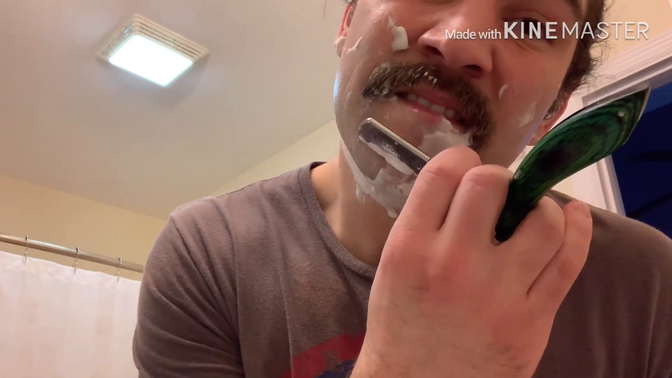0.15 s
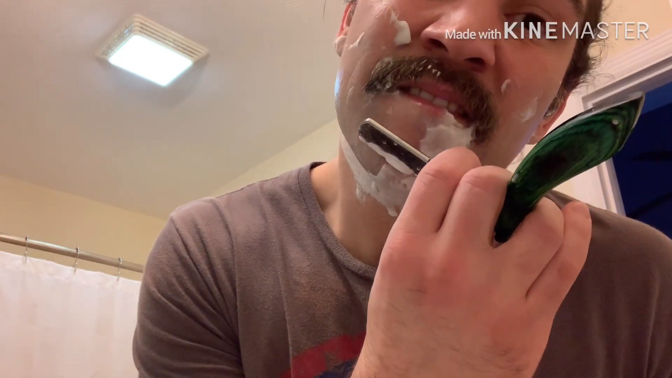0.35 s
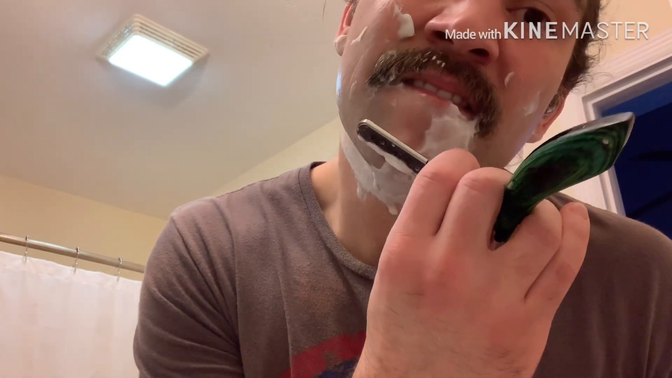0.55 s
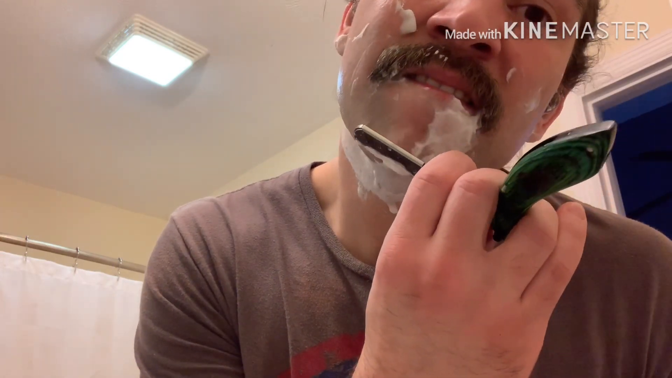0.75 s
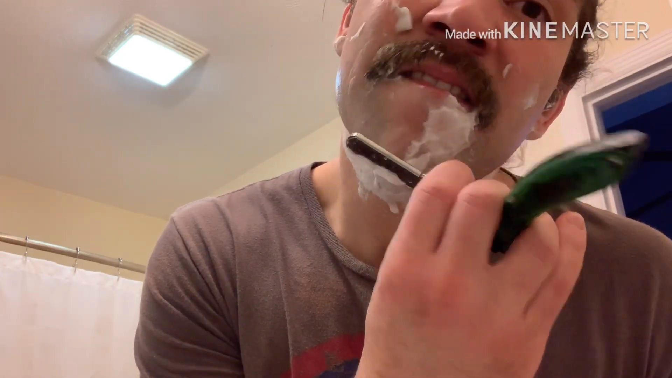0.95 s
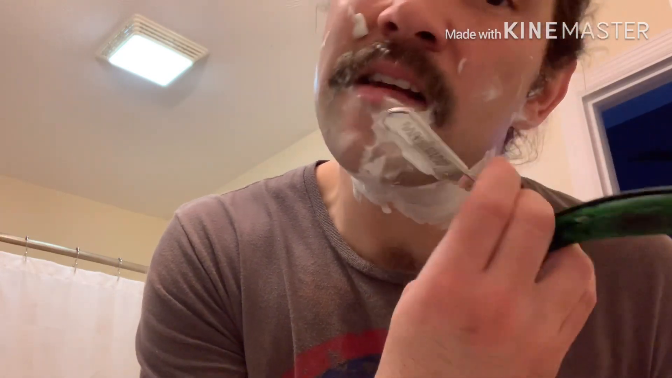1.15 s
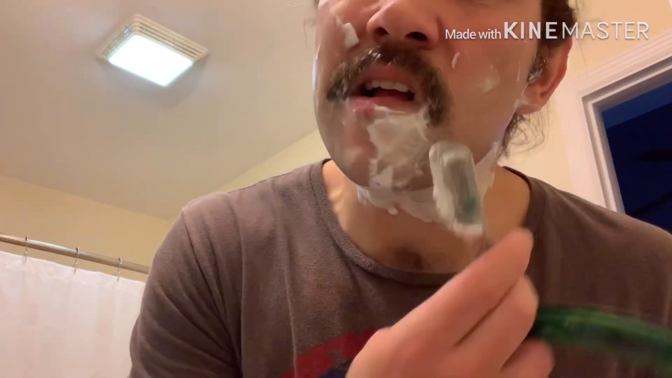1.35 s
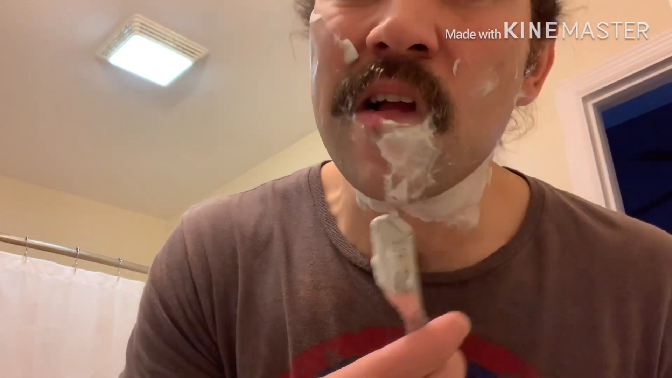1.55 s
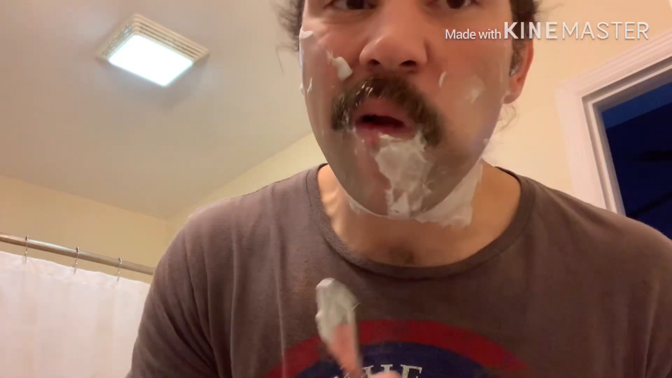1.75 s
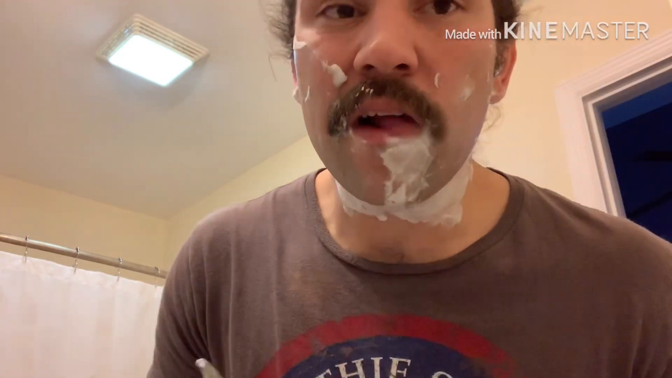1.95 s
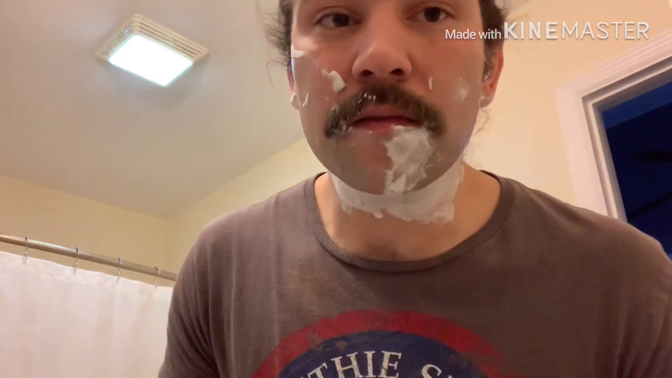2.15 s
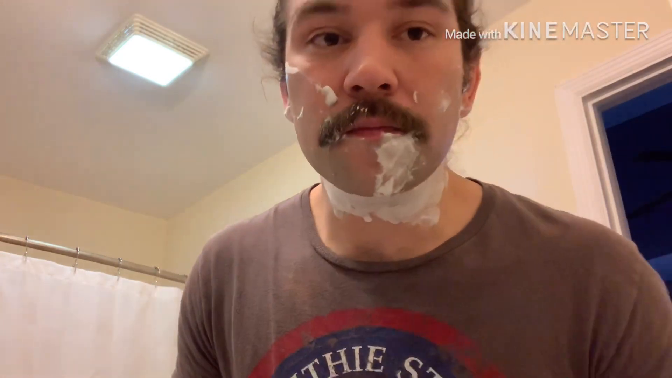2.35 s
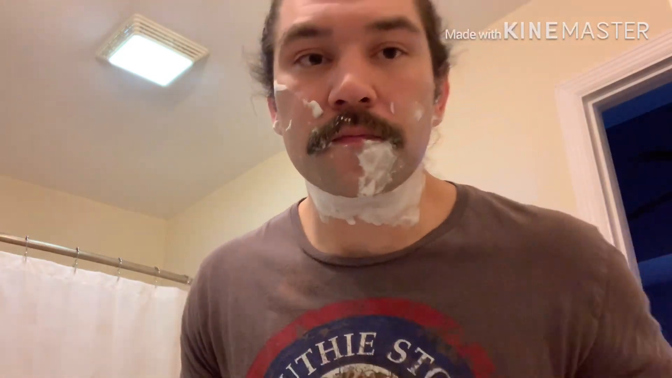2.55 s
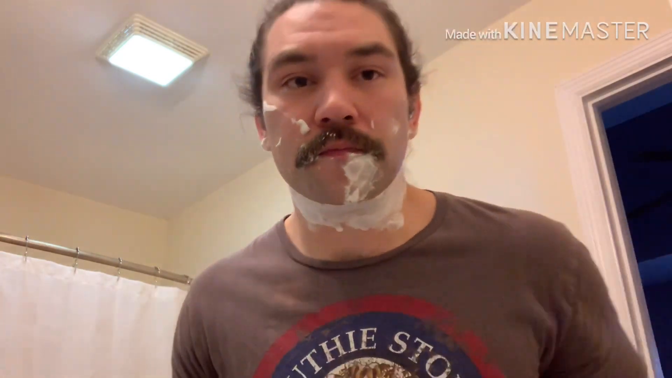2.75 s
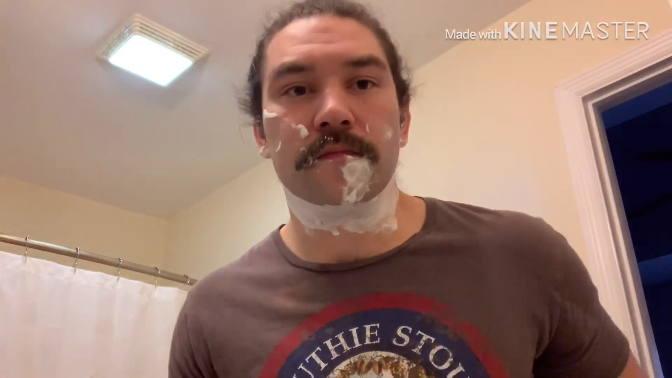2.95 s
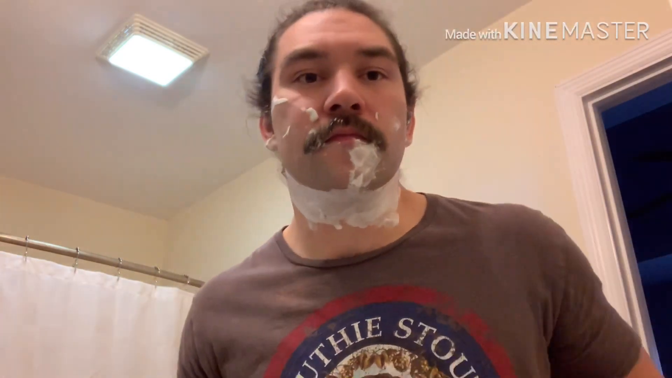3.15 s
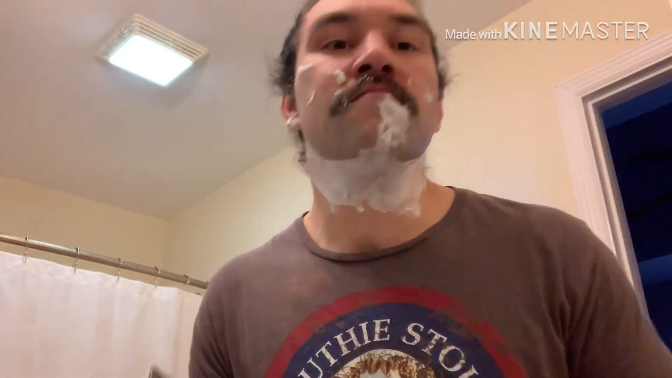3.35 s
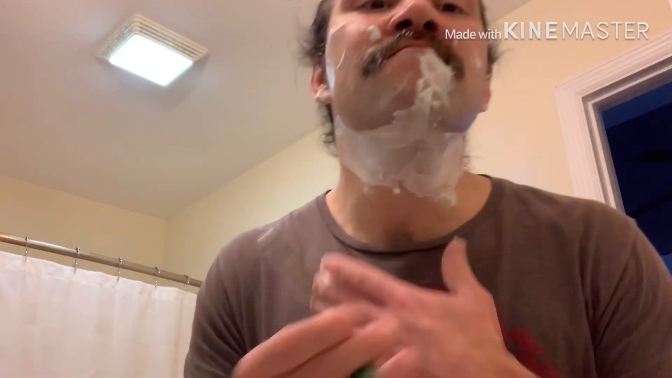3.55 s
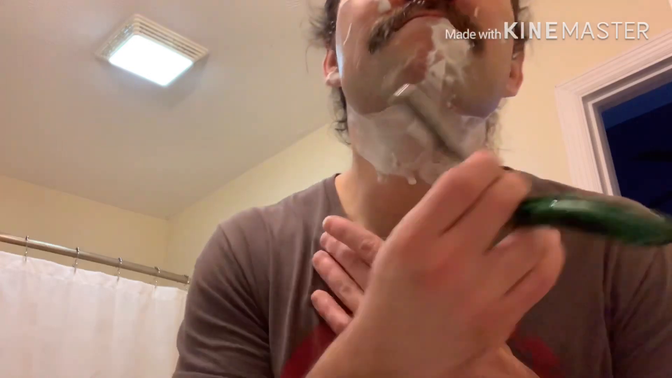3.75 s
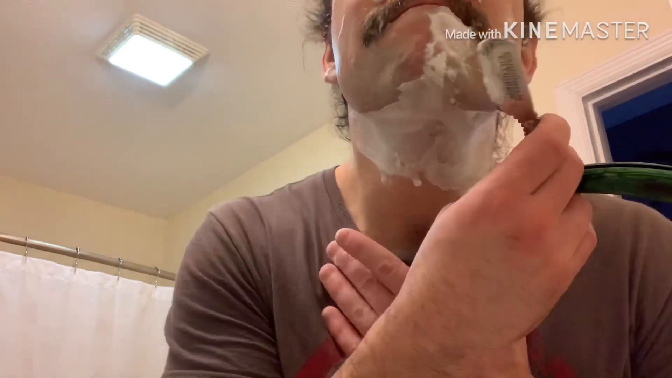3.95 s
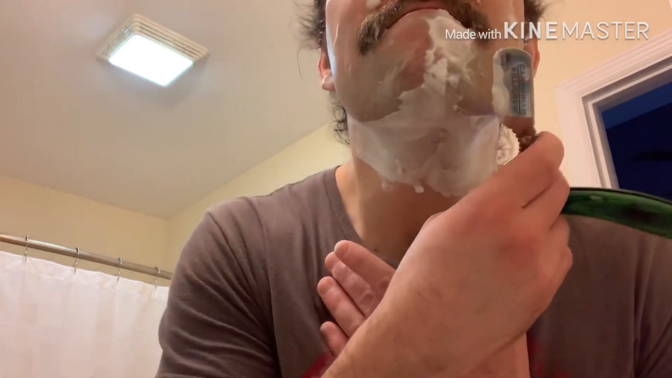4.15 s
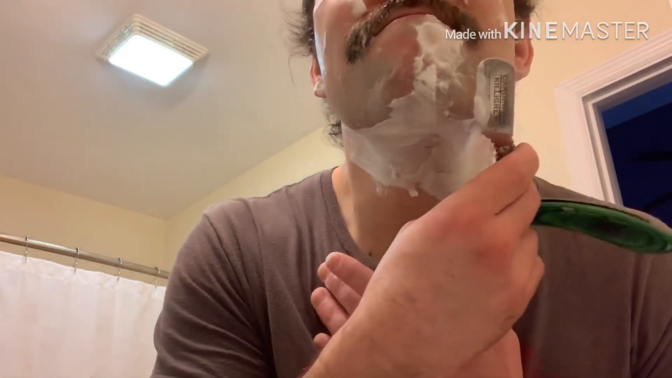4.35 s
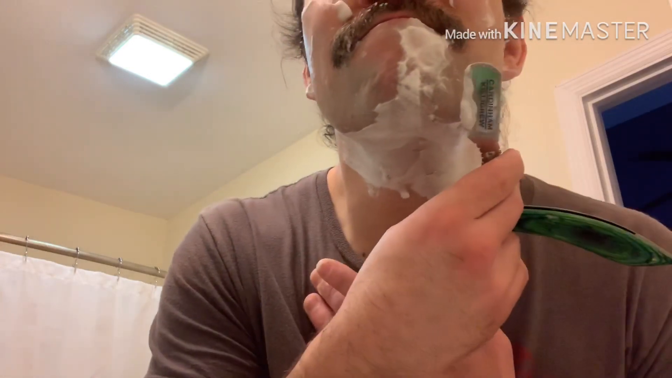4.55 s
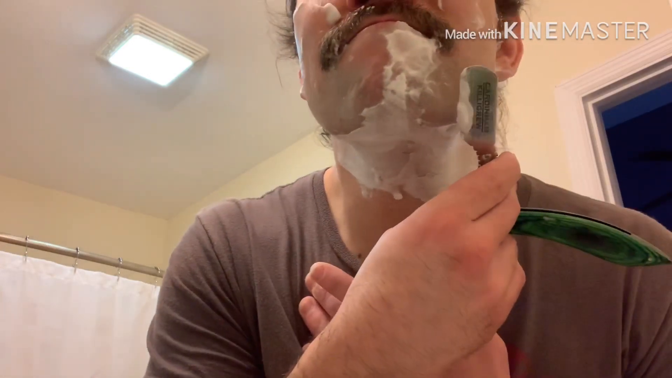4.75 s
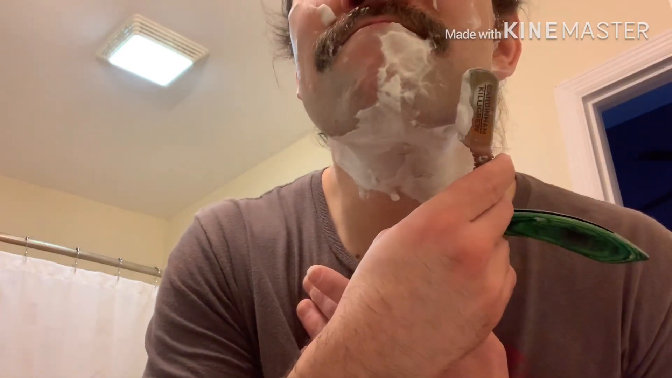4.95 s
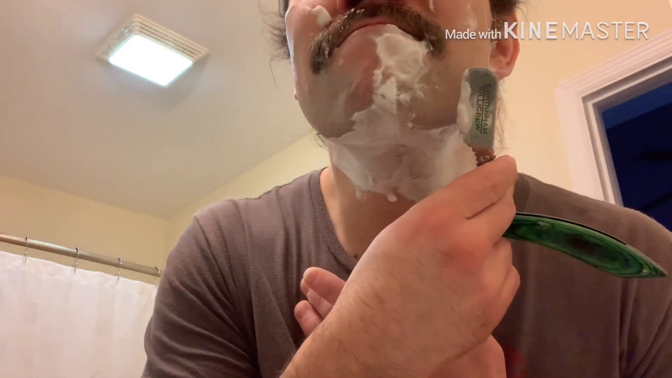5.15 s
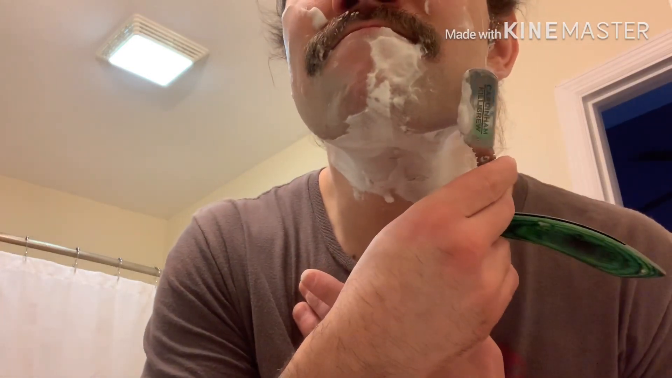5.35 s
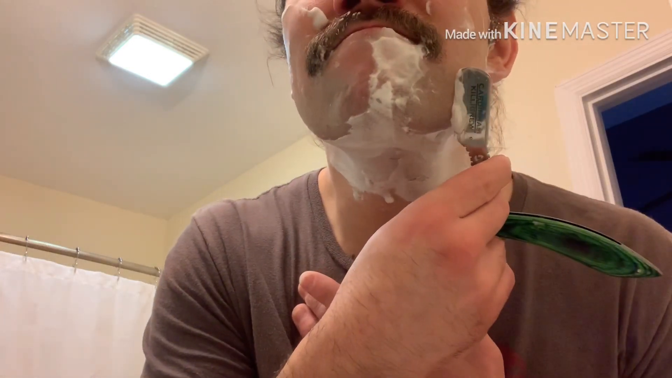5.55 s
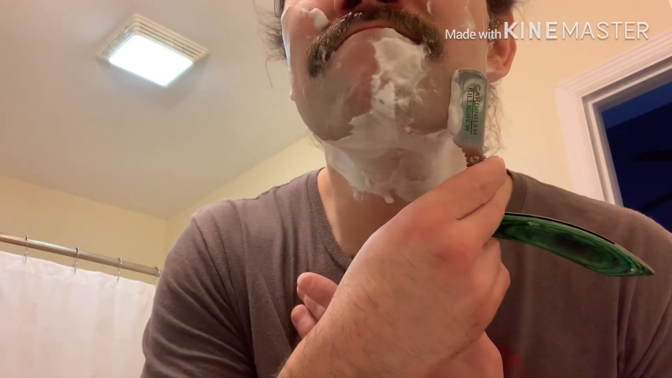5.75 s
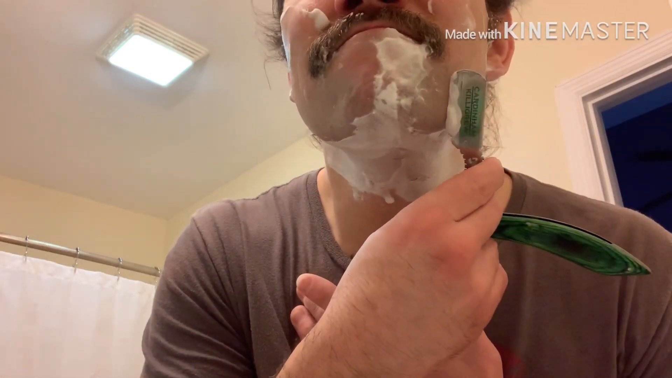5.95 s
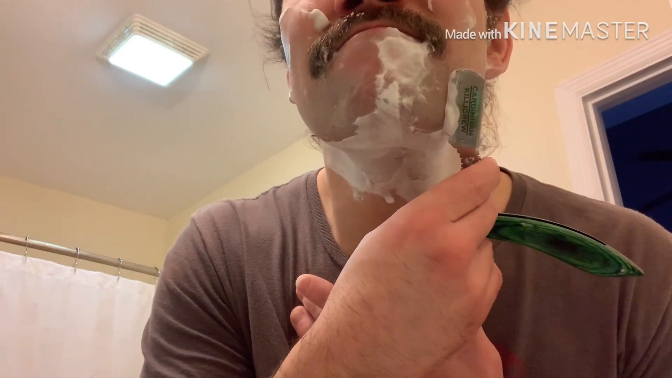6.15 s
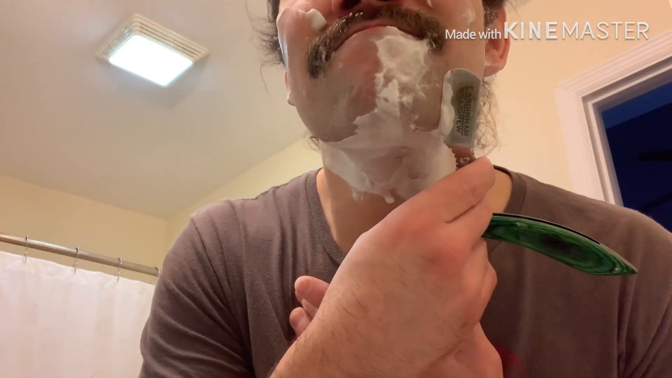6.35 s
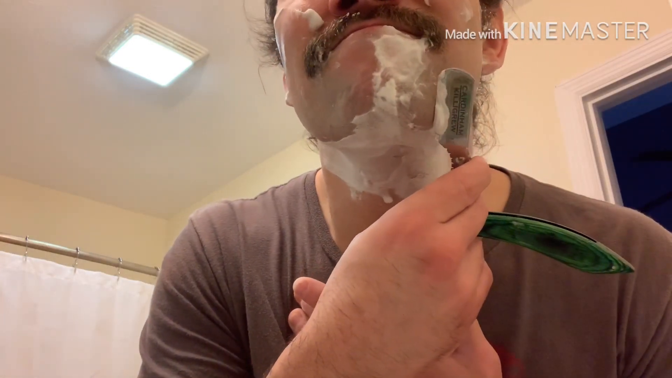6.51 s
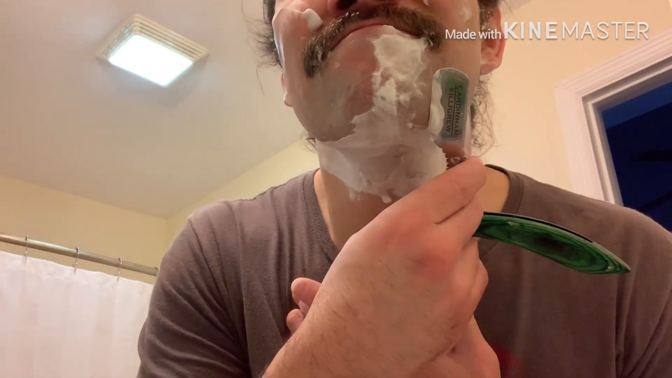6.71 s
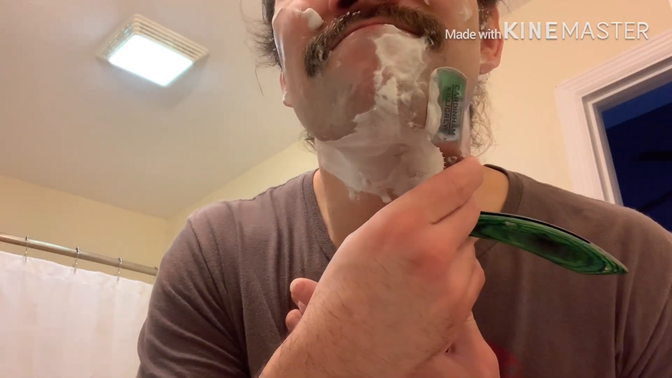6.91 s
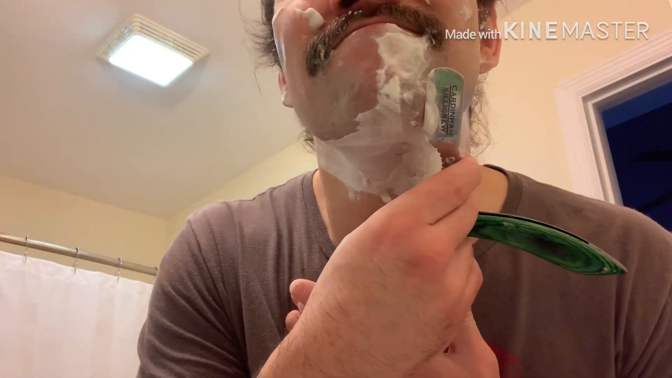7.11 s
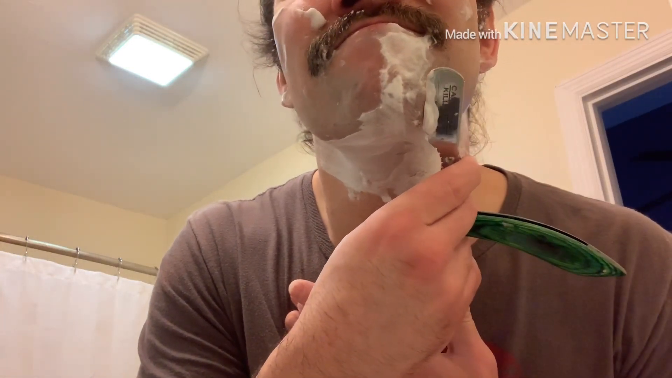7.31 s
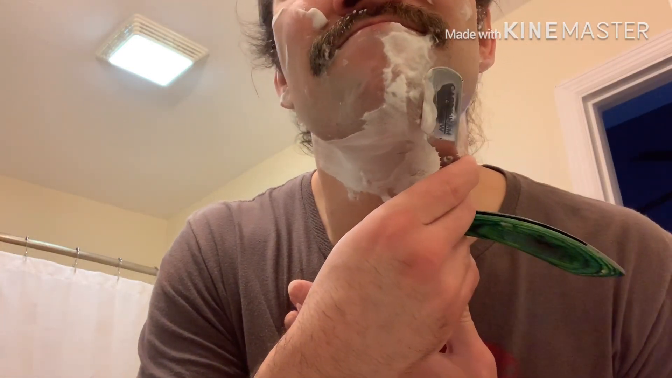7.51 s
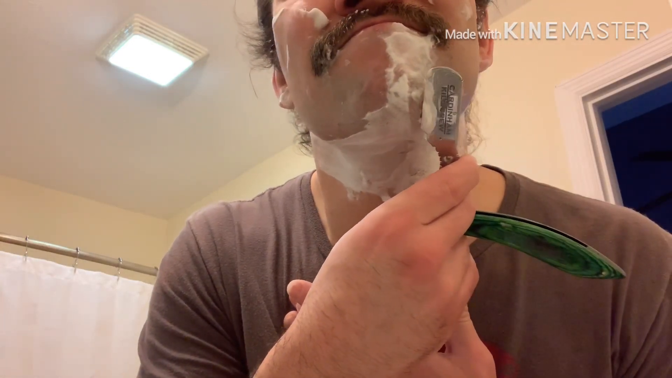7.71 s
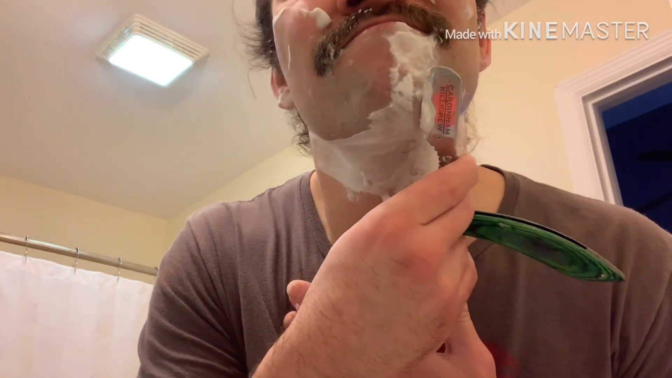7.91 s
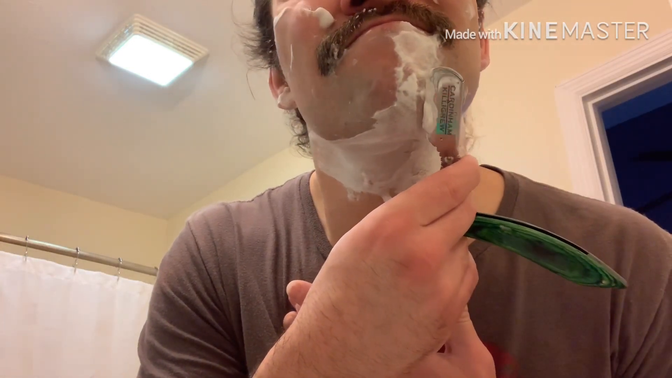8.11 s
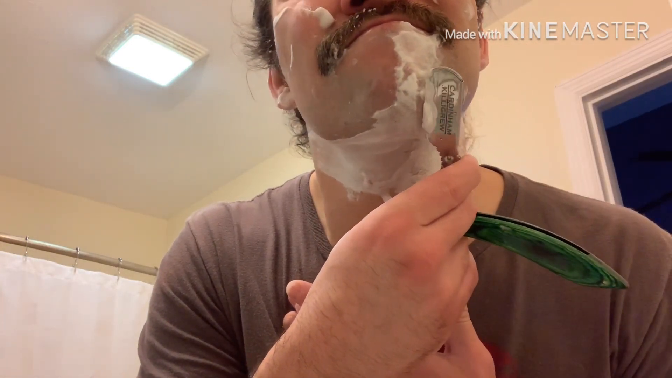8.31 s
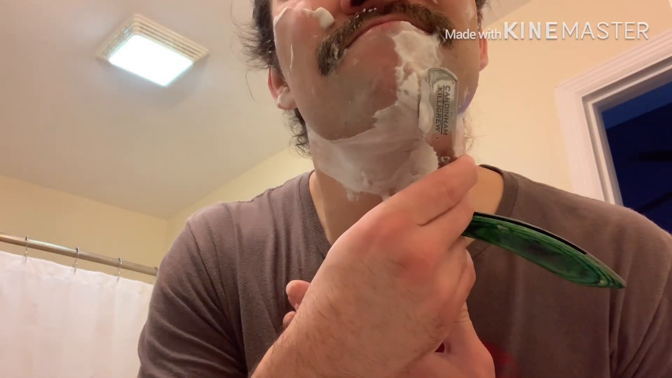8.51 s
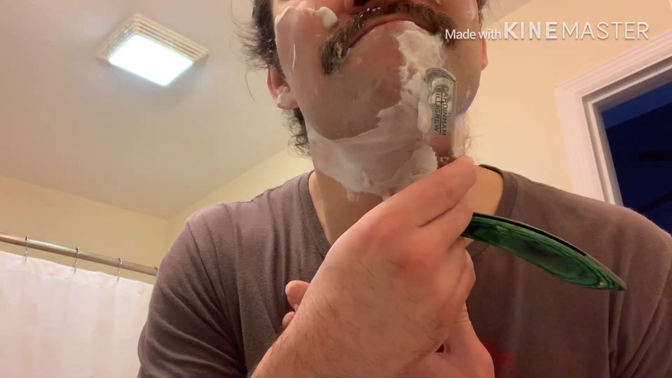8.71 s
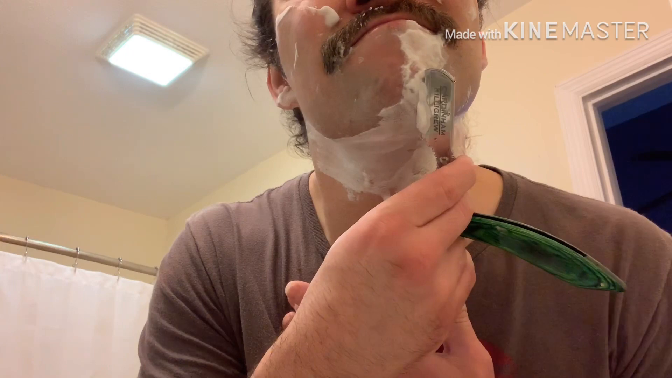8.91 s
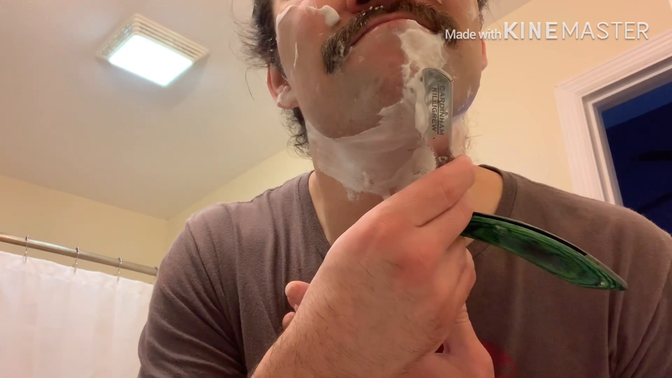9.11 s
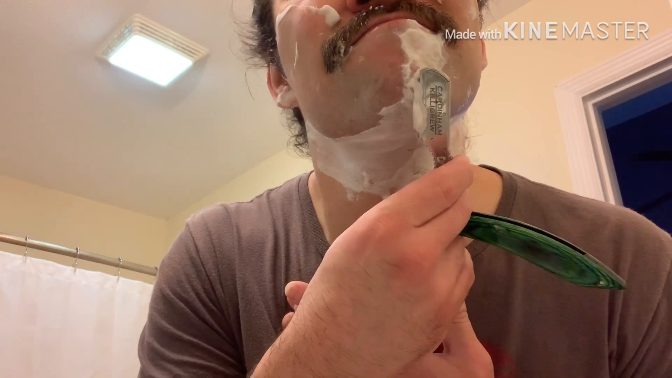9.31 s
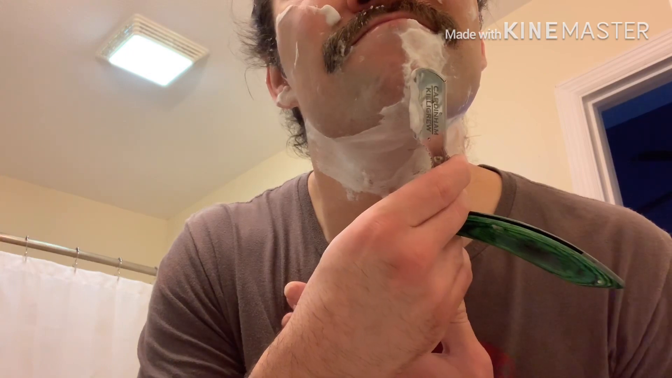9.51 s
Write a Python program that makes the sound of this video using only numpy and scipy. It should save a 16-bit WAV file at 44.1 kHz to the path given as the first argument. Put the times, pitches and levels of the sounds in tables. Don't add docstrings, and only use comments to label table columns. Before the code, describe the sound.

A razor crackles through lathered stubble in a small fan-hummed bathroom, pauses for a rubbing, spraying, knocking rinse, then resumes with brighter snaps.

```python
import sys
import numpy as np
from scipy import signal
from scipy.fft import rfft, irfft, next_fast_len
from scipy.io import wavfile
from scipy.ndimage import uniform_filter1d

SR = 44100
rng = np.random.default_rng(int(sys.argv[2]) if len(sys.argv) > 2 else 0)


def inscribe(sig):
    pcm = np.round(np.clip(np.atleast_2d(sig).T, -1, 1) * 32767)
    wavfile.write(sys.argv[1], SR, pcm.astype(np.int16))


def boost_factor(decibels):
    exponent = np.asarray(decibels, float) / 20
    return 10 ** exponent


N = 426447
SIZE = next_fast_len(N + SR)
HZ = np.arange(SIZE // 2 + 1) * SR / SIZE + 1e-3
TIME = np.arange(N) / SR


def on_log(table, hz=HZ):
    f, value = np.transpose(table)
    return np.interp(np.log(hz), np.log(f), value)


def colour(table):
    low_hz, low_db = table[0]
    return boost_factor(on_log([(low_hz / 2, low_db - 30), *table, (table[-1][0] * 1.05, -90)]))


def resonance(hz, width):
    return 1 / (1 + 1j * (HZ - hz ** 2 / HZ) / width)


def shape(x, gain):
    return irfft(rfft(x, SIZE) * gain, SIZE)[..., :N]


def level(x, db):
    return x * boost_factor(db) / np.sqrt(np.mean(x ** 2))


def walk(rate):
    hold = int(SR / rate)
    steps = np.repeat(rng.standard_normal(N // hold + 1), hold)
    slewed = uniform_filter1d(uniform_filter1d(steps, hold), hold)
    return level(slewed[:N], 0)


def swells(table, tilt_db=0):
    peak_s, rise, fall, db = np.transpose(table)[:4, :, None]
    t = TIME[::32]
    before = (peak_s - t) / np.maximum(rise, .005)
    after = (t - peak_s) / np.maximum(fall, .005)
    ramp = np.where(t < peak_s, before, after)
    power = np.sum(boost_factor(db + tilt_db - 20 * ramp) ** 2, axis=0)
    return np.interp(TIME, t, np.sqrt(power))


def grit(spread_db, rate):
    sizes = boost_factor(spread_db * np.minimum(rng.exponential(size=N), 2))
    slips = uniform_filter1d(sizes * (rng.random(N) < rate / SR), size=40)
    return rng.standard_normal((2, N)) * (4 + level(slips, 0))


def patchy(x, gain, patchy_db, rate):
    spectrum, out = rfft(x, SIZE) * gain, 0
    for hz in 300 * 2 ** np.arange(0, 4.8, .4):
        weight = np.clip(1 - abs(np.log2(HZ / hz)) / .4, 0, 1)
        band = irfft(spectrum * weight, SIZE)[:, :N]
        out = out + band * boost_factor(patchy_db * walk(rate))
    return out


def burst(t60, rise=0.00017):
    t = np.arange(int(t60 * SR)) / SR
    return rng.standard_normal(len(t)) * boost_factor(-60 * t / t60) * np.clip(t / rise, 0, 1)


# (frequency [Hz], time [s])
ROOM_T60 = [(500, 0.95), (2000, 0.29), (6000, 0.21), (12000, 0.058)]


def room():
    t, tail = np.arange(SR) / SR, 0
    for hz in 250 * 2. ** np.arange(7):
        edges = [hz / 2 ** .5, min(hz * 2 ** .5, .45 * SR)]
        octave = signal.butter(2, edges, "band", fs=SR, output="sos")
        noise = signal.sosfilt(octave, rng.standard_normal((2, SR)))
        tail = tail + noise * boost_factor(-60 * t / on_log(ROOM_T60, hz)) * np.clip(t / 0.001 - .4, 0, 1)
    return rfft(tail / np.sqrt(np.sum(tail ** 2) / 2), SIZE)


# (frequency [Hz], level per Hz [dB])
HISS = [(1500, -5.5), (3000, -3), (6000, -7.5), (10000, -4.5), (14200, -6), (14900, -10.5), (15500, -32)]


def microphone_hiss():
    return level(shape(rng.standard_normal((2, N)), colour(HISS)), -82.5)


# (frequency [Hz], level per Hz [dB])
FAN_AIR = [(12, -44), (20, -6), (54, 0.5), (81, -6), (107, -2), (208, -3.5), (294, -9), (338, -16),
           (431, -9.5), (487, -18), (584, -13), (659, -30.5), (892, -32), (1140, -38.5), (2500, -48.5),
           (3250, -97), (5500, -120)]
# (frequency [Hz], width [Hz], level [dB])
DUCT_MODES = [(53, 17, 4), (110, 7.6, 6.5), (165, 4.8, 2), (207.8, 14, 7), (294.8, 13, 7), (365.5, 16, 3),
              (577, 25, -2), (816, 77, 9.5)]


def fan():
    duct = 1 + sum((boost_factor(db) - 1) * abs(resonance(hz, width)) for hz, width, db in DUCT_MODES)
    turbulence = rng.standard_normal((2, SIZE))
    air = shape(turbulence, colour(FAN_AIR) * duct) * boost_factor(.6 * walk(2))
    return level(air, -51)


# (peak time [s], rise [s], fall [s], peak level [dB])
LEAN = [(1.74, 0.17, .15, -53), (1.93, 0.15, 0.084, -49.5), (2.19, 0.21, 0.48, -38),
        (2.43, 0.37, 0.21, -36), (2.82, .3, 0.74, -44.5), (3.62, 0.054, 0.13, -59),
        (3.92, 0.23, 0.26, -50.5), (4.08, 0.075, 0.22, -51), (4.43, 0.075, 0.18, -49.5),
        (4.66, 0.23, 0.13, -53), (4.85, .2, 0.15, -51)]
# (frequency [Hz], width [Hz], level [dB])
COUNTER_MODES = [(53.8, 17.3, 1.5), (132.5, 40.6, -0.5), (351.3, 14.6, -3.5), (600, 190, -36)]


def counter():
    modes = sum(boost_factor(db) * abs(resonance(hz, 1.56 * width)) ** 2 for hz, width, db in COUNTER_MODES)
    return swells(LEAN) * level(shape(rng.standard_normal((2, N)), modes), 0.2)


# (peak time [s], rise [s], fall [s], peak level [dB])
RINSE = [(2.21, 0.22, 0.25, -69.5), (2.44, 0.47, 0.24, -70.5), (2.57, 0.23, .5, -71.5),
         (2.8, 0.0044, 0.11, -53), (3.0, 0.1, 0.18, -57.5), (3.1, 0.22, 0.13, -56.5),
         (3.19, 0.27, 0.069, -58), (3.74, 0.62, 0.14, -74), (3.92, 0.24, 1, -78), (4.42, .1, 0.11, -74.5),
         (4.53, 0.017, .02, -72)]
# (frequency [Hz], level per Hz [dB])
SPRAY = [(2500, -5), (4000, 0), (6000, 4), (8500, 6), (11500, 1), (13500, -3), (15500, -1), (15900, -23)]


def rinse():
    spray = level(shape(grit(1.2, rate=2400), colour(SPRAY)), 2.5)
    return spray * swells(RINSE) * boost_factor(walk(30.47))


# (peak time [s], rise [s], fall [s], peak level [dB], bright fibres [dB])
RUB = [(1.72, .04, 0.2, -64, -16), (1.86, 0.17, 0.23, -68.5, -20), (2.19, 0.16, 0.27, -45.5, -10.5),
       (2.43, 0.19, 0.1, -49, -11.5), (2.58, 0.17, 0.08, -54.5, -14), (2.79, 0.21, 0.18, -51.5, -14),
       (2.94, 0.046, 0.27, -52.5, -5), (3.08, 0.23, 0.18, -59.5, 7.5), (3.18, .2, 0.13, -59, -6),
       (3.53, 0.15, 0.35, -69.5, -10), (3.72, 0.57, 0.23, -71.5, -1.5), (3.92, 0.22, 0.17, -55, -14),
       (4.06, 0.084, 0.13, -57, -18), (4.25, 0.094, 0.11, -66.5, -25), (4.4, 0.13, 0.23, -56.5, -4.5),
       (4.6, 0.28, 0.45, -64, -7), (4.85, 0.51, 0.052, -71, -13), (5.38, 0.019, 0.085, -68, -10),
       (7.64, .04, .15, -80, -6)]
# (frequency [Hz], level per Hz [dB])
CLOTH_BODY = [(300, 7.5), (590, 9), (670, -1.5), (860, 3), (1100, -2), (1400, 1), (1900, -3.5),
              (2500, -12.5), (3500, -17), (5000, -77)]
# (frequency [Hz], level per Hz [dB])
FIBRES = [(2000, 15), (3000, 10.5), (4500, 6), (6500, -9), (8000, -6)]


def cloth():
    folds = level(patchy(grit(4.0, rate=580), colour(CLOTH_BODY), patchy_db=2.5, rate=40), 5.35)
    fibres = level(shape(grit(1.7, rate=94), colour(FIBRES)), 0.52)
    fibre_db = np.array(RUB)[:, 4:]
    return swells(RUB) * folds + swells(RUB, fibre_db) * fibres


# (time [s], peak level [dB], body ring [dB])
BASIN = [(1.6825, -58, 1), (1.6994, -58.5, -3), (1.775, -47.5, -15), (2.0273, -58, 6), (2.0487, -52.5, -1),
         (2.0785, -45, -8), (2.1096, -43, -7), (2.133, -44.5, -8), (2.1541, -56, 1), (2.1984, -41, -9),
         (2.3456, -45.5, -24), (2.412, -52, 0), (2.564, -60, 6), (2.689, -56, 1.5), (2.7804, -49.5, -6),
         (2.9288, -50, -12), (3.108, -44, -18)]
# (time [s], peak level [dB])
GRIP = [(3.879, -58), (3.919, -50.5), (3.9998, -52.5), (4.0352, -57), (4.0577, -52.5), (4.2976, -62.5),
        (4.318, -65), (4.3335, -61), (4.3473, -62), (4.366, -64), (4.3814, -55), (4.3994, -59.5),
        (4.4218, -52), (4.4424, -57), (4.5289, -53.5), (4.5585, -57), (4.6421, -54.5)]
# (time [s], peak level [dB], body ring [dB])
PIVOT = [(4.8559, -78, 23), (5.049, -74.5, 21), (5.0812, -77, 6), (5.1884, -79.5, 25), (5.205, -76, 14),
         (5.237, -79.5, 19), (8.4088, -73, -8)]
# (time [s], peak level [dB], body ring [dB])
TAPS = [(5.3602, -65.5, 4.5), (6.566, -65.5, 10.5), (6.59, -66, 6), (7.3708, -74.5, 17), (7.4295, -65, 7),
        (7.4744, -69, 7), (7.6185, -73.5, 19), (7.7109, -71, 9), (7.7634, -67, 2), (7.942, -66.5, 10),
        (7.9528, -58.5, 5.5), (8.195, -74, 16), (8.2896, -76.5, 16), (8.616, -70, 11),
        (8.6906, -52.5, 10.5), (8.7044, -56, -4), (8.74, -68, 3), (8.765, -67, 3), (8.8194, -77, 9),
        (9.621, -65.5, 8.5)]
# (frequency [Hz], width [Hz], level [dB])
RINGS = [
    [(567, 87, 3), (844, 125, 0)],
    [(1380, 400, 0), (1780, 380, -3), (2310, 370, -10.5)],
    [(3120, 980, 1), (3570, 500, 3), (4220, 2000, -2)],
]


def knocks():
    grip = [(s, db, 8) for s, db in GRIP]
    kinds = [(BASIN, -25, .093), (grip, -11, .05), (PIVOT, -1, .12), (TAPS, -12.5, .085)]
    rows = [(*row, bright_db, t60) for kind, bright_db, t60 in kinds for row in kind]
    sound = 0
    for group, rings in enumerate(RINGS):
        for hz, width, db in rings:
            blows = np.zeros((2, N + SR))
            for s, peak_db, body_db, bright_db, t60 in rows:
                blow = level(np.stack([burst(t60, rise=.0015) for _ in range(2)]), -10)
                group_db = (body_db, 0, bright_db)[group]
                blow_db = peak_db + group_db + db + 2.2 * rng.standard_normal()
                i = int(s * SR)
                blows[:, i:i + blow.shape[1]] += boost_factor(blow_db) * blow / np.sqrt(width / 1000)
            sound = sound + rfft(blows, SIZE) * resonance(hz, 1.82 * width) ** 2
    return boost_factor(6.5) * irfft(sound, SIZE)[:, :N]


# (time [s], level [dB])
TOUCHES = [
    (1.769, -15),
    (1.7715, 0),
]
# (frequency [Hz], level [dB], decay time T60 [s])
STEEL_MODES = [(1780, -35, .035), (2060, -36, .022), (2400, -36, .022), (2680, -41, .02), (4300, -56, .015),
               (5600, -58, .015), (11000, -62, .008)]


def clink():
    out, t = np.zeros(N), TIME[:SR // 10]
    modes = sum(boost_factor(db - 60 * t / t60) * np.sin(2 * np.pi * hz * t) for hz, db, t60 in STEEL_MODES)
    for s, touch_db in TOUCHES:
        out[int(s * SR):][:len(t)] += boost_factor(touch_db) * np.clip(t / 0.0017, 0, 1) * modes
    return out


# (time [s], peak level [dB], ring [Hz])
FIRST_TICK = [(1.2243, -58, 3250)]
# (time [s], peak level [dB], ring [Hz])
TICKS = [(1.6814, -72, 2350), (2.0255, -60, 2260), (2.563, -62, 2380), (3.8696, -62, 3080),
         (3.8924, -59, 2930), (3.9174, -61, 3150), (3.933, -53, 2190), (3.998, -55, 3190),
         (4.0345, -52.5, 3190), (4.0567, -61, 2260), (4.2757, -68, 3350), (4.297, -60, 2560),
         (4.3044, -63, 2340), (4.3187, -61, 3070), (4.3321, -58, 3130), (4.347, -58, 2430),
         (4.365, -60, 3640), (4.383, -55, 3890), (4.399, -55, 2400), (4.4209, -55, 3880),
         (4.4453, -56, 3260), (4.5282, -54, 2510), (4.557, -55, 2460), (4.6414, -65, 3300),
         (4.8569, -70, 2220), (5.0579, -76, 3000), (5.1896, -76, 3640), (5.3607, -74, 3560),
         (6.5704, -73, 3530), (7.3701, -73, 2600), (7.4308, -65, 2360), (7.4727, -65, 2580),
         (7.6196, -78, 3590), (7.709, -69, 2600), (7.7643, -71, 2820), (7.9424, -76, 2660),
         (7.9538, -60, 2870), (8.1945, -69, 2360), (8.2896, -76, 2850), (8.4083, -70.5, 2220),
         (8.6178, -71, 2650), (8.6274, -71, 2360), (8.6896, -55, 2360), (8.8154, -68, 2630)]
# (multiple of the ring, level [dB])
TICK_RINGS = [(.45, 2), (.66, 7.5), (1, 6), (1.25, -4), (1.9, -10)]


def ticks():
    out, t = np.zeros((2, N)), TIME[:SR // 30]
    chances = rng.standard_normal((len(TICKS) + 1, 6))
    for (s, peak_db, hz), chance in zip(FIRST_TICK + TICKS, chances):
        for side in range(2):
            delay = .0003 + .0001 * chance[5] * (side - .5)
            late = np.maximum(t - delay, 0)
            rings = sum(boost_factor(db + 0.83 * c) * np.sin(2 * np.pi * k * hz * late)
                        for (k, db), c in zip(TICK_RINGS, chance))
            decay = boost_factor(peak_db - 1.5 - 60 * late / 0.018)
            out[side, int(s * SR):][:len(t)] += decay * np.minimum(late / 0.00052, 1) * rings
    return out


# (start time [s], length [s], peak level [dB])
STROKES = [(.065, .13, -69), (0.235, .1, -60), (0.408, .13, -70), (0.61, .18, -66.5), (2.036, .03, -54),
           (5.965, .08, -57), (6.086, .11, -62), (6.236, .09, -52.5), (6.388, .03, -52), (6.428, .05, -47),
           (6.5, .1, -57), (6.792, .16, -61), (7.103, .07, -53), (7.376, .1, -61.5), (7.524, .07, -66),
           (7.763, .2, -62.5), (8.44, .03, -59), (8.69, .003, -58), (8.74, .11, -68), (9.103, .03, -61),
           (9.59, .04, -67), (1.224, .002, -57), (1.77, .008, -52), (1.844, .002, -54)]


def fine_hairs():
    rate, scatter_db = 110, 4.5
    rows = []
    for s, length, db in STROKES:
        chance = rng.random((20, 3))
        gaps = -np.log(chance[:, 0]) / rate
        moments = np.cumsum(gaps) * (np.arange(20) > 0)
        for moment, (_, c, d) in zip(moments, chance):
            if moment < length:
                hair_db = db - 4 + scatter_db * (2 * c - 1) * 1.8
                rows.append((s + moment, hair_db, -20 + 6 * d))
    return rows


# (time [s], peak level [dB])
CHIN = [(.0996, -51), (0.123, -52), (.134, -42), (.1371, -52), (.1636, -46), (0.24, -46), (0.2427, -45.5),
        (.3116, -58), (.3205, -47.5), (.3755, -51), (.4108, -53), (.432, -47), (0.459, -45.5), (.4727, -46),
        (.5184, -50), (0.548, -54), (.63, -58), (.6522, -53), (.6867, -56), (.6929, -57)]
# (time [s], peak level [dB])
CHEEK = [(5.9754, -47), (5.9951, -53), (6.021, -44), (6.0236, -40), (6.028, -34.5), (6.0408, -39.5),
         (6.122, -46), (6.239, -45), (6.261, -40.5), (6.2689, -41), (6.378, -44.5), (6.4094, -41.5),
         (6.422, -36.5), (6.446, -40.5), (6.451, -44), (6.4878, -48), (6.523, -49), (6.526, -40.5),
         (6.562, -42), (6.5683, -40), (6.6095, -50), (6.6512, -44), (6.681, -48), (6.6997, -43.5),
         (6.786, -49), (6.801, -43.5), (6.8624, -48), (6.877, -46), (6.8966, -49), (7.039, -58)]
# (time [s], peak level [dB])
JAW = [(7.112, -44), (7.121, -46), (7.143, -49), (7.1645, -48), (7.3921, -60), (7.4504, -49.5),
       (7.524, -51.5), (7.8231, -37.5), (7.8561, -47), (7.9019, -63), (8.438, -38), (8.462, -46),
       (8.7347, -46.5), (8.78, -55), (8.8588, -53), (9.0046, -54.5), (9.115, -43), (9.134, -46),
       (9.2124, -55), (9.2224, -46), (9.2943, -52), (9.314, -41.5), (9.351, -35.5), (9.3693, -56),
       (9.421, -51), (9.4321, -40.5), (9.487, -49), (9.6114, -50.5)]
# (frequency [Hz], level per Hz [dB])
BLADE = [(6500, -16), (8000, -3.5), (10000, 1), (12500, 4), (14500, 7), (15900, -0.5), (16300, -30),
         (16700, -29)]
# (frequency [Hz], level per Hz [dB])
SKIN = [(2000, -23.5), (4000, -9.5), (5500, -4.5), (6900, 0.5), (7600, 7)]


def razor():
    blade, skin = np.zeros(N + SR), np.zeros(N + SR)
    passes = [(CHIN, -24.5), (CHEEK, -18), (JAW, -25)]
    thick = [(s, db, dull_db) for hairs, dull_db in passes for s, db in hairs]
    for s, peak_db, dull_db in thick + fine_hairs():
        crack, i = level(burst(0.006, rise=0.00035), -11.5), int(s * SR)
        blade[i:i + len(crack)] += boost_factor(peak_db) * crack
        skin[i:i + len(crack)] += boost_factor(peak_db + dull_db) * crack
    snaps = boost_factor(0.5) * shape(blade, colour(BLADE)) + boost_factor(8.5) * shape(skin, colour(SKIN))
    mirror_s, mirror_db = .0062, -20.5
    return snaps + boost_factor(mirror_db) * np.roll(snaps, int(mirror_s * SR))


# (frequency [Hz], likeness [0-1])
ALIKE = [(100, 0.99), (300, 0.95), (640, 0.84), (1400, 0.26), (3000, 0.02)]


def scene():
    walls = room()
    blade, taps, steel = razor(), knocks(), clink() + ticks()
    far = boost_factor(-9) * taps + boost_factor(-16) * steel
    blade_walls = walls * boost_factor(-1.5 + 2 * (HZ < 7200))
    near = blade + taps + steel + shape(far, walls) + shape(blade, blade_walls)
    handling = cloth() + counter()
    left, right = rfft(near + handling + rinse() + fan() + microphone_hiss(), SIZE)
    alike = np.clip(on_log(ALIKE), 0, 1)
    mid = (left + right) / 2 * np.sqrt(1 + alike)
    side = (left - right) / 2 * np.sqrt(1 - alike)
    return irfft(np.stack([mid + side, mid - side]), SIZE)[:, :N]


def low_pass(x):
    return signal.sosfilt(signal.butter(12, 16850, fs=SR, output="sos"), x)


# (frequency [Hz], share [0-1])
ONE_CAPSULE = [(5600, 0), (6600, .5), (7600, .74), (9000, .99)]


def record(dry):
    lead_s, in_step_hz = .000154, 10700
    left, right = rfft(dry, SIZE)
    one = on_log(ONE_CAPSULE)
    turned = left * np.exp(2j * np.pi * lead_s * (HZ - in_step_hz))
    bass = boost_factor(0.89 * (HZ < 400))
    right = bass * (one * turned + np.sqrt(1 - one ** 2) * right)
    mix = irfft(np.stack([left, right]), SIZE)[:, :N]
    return low_pass(mix)


dry = scene()
out = record(dry)
inscribe(out)
```